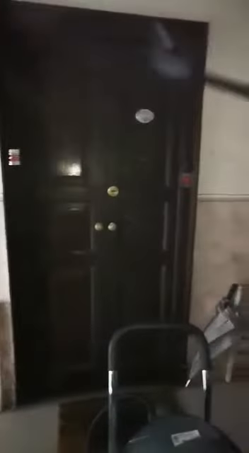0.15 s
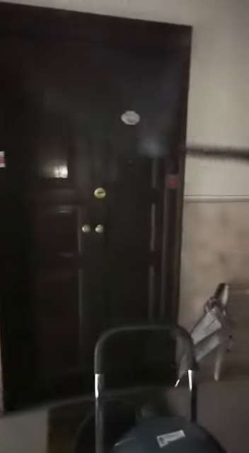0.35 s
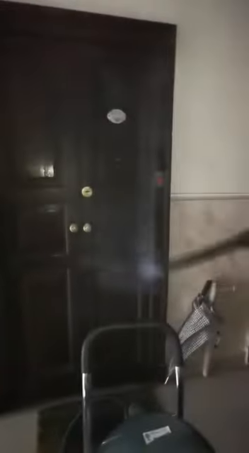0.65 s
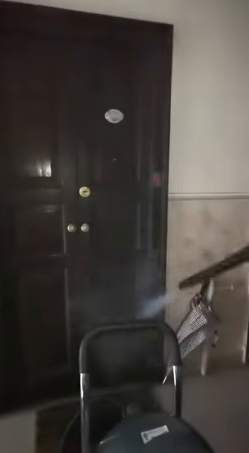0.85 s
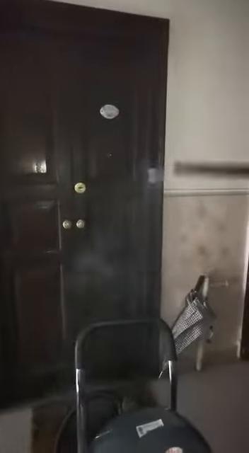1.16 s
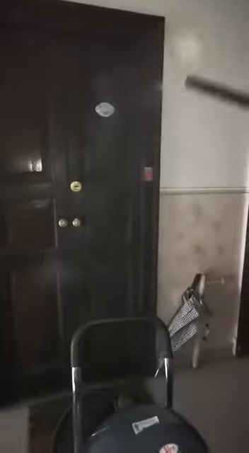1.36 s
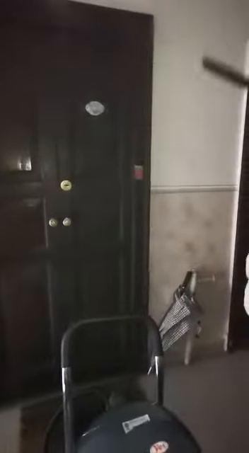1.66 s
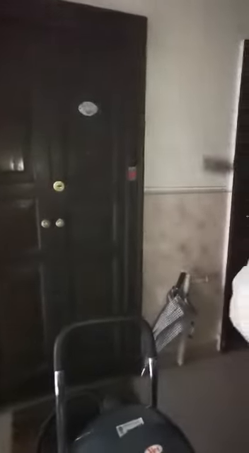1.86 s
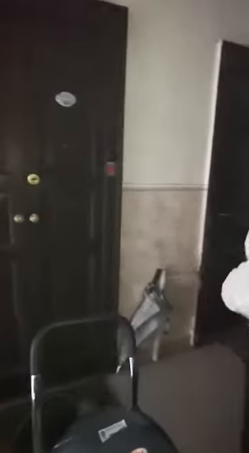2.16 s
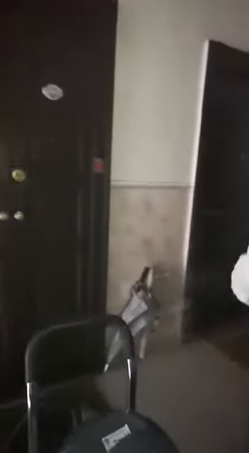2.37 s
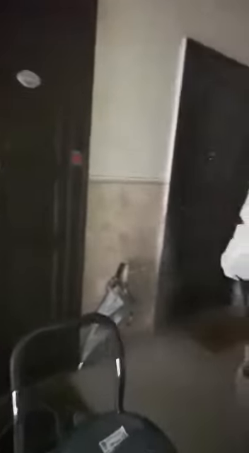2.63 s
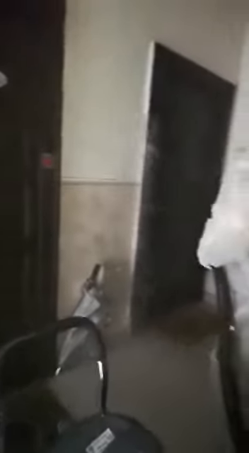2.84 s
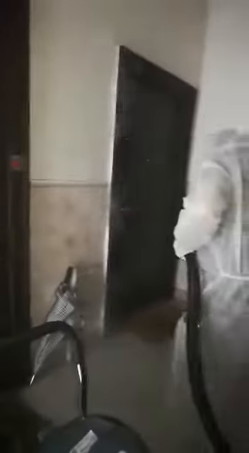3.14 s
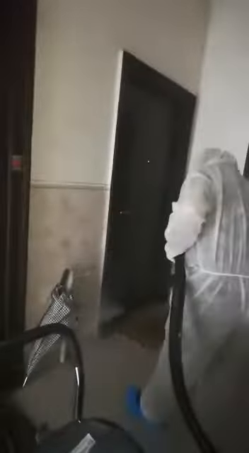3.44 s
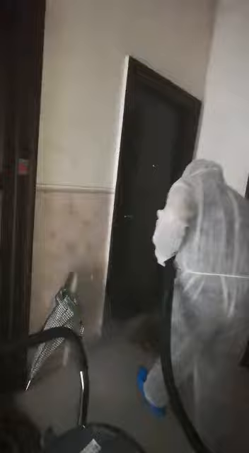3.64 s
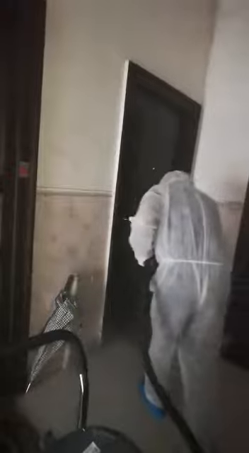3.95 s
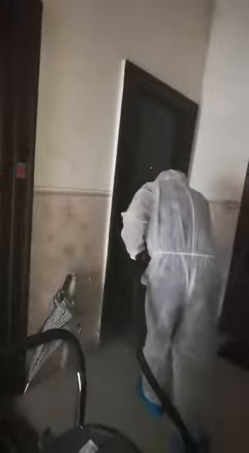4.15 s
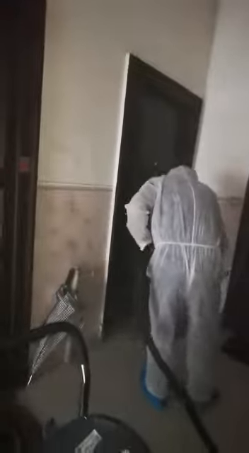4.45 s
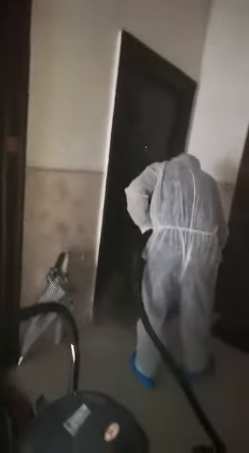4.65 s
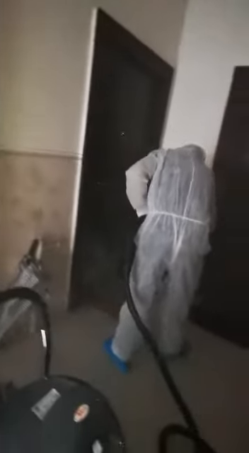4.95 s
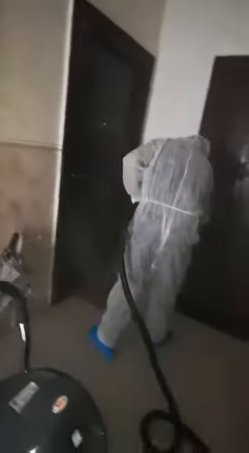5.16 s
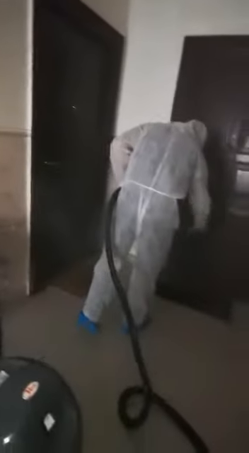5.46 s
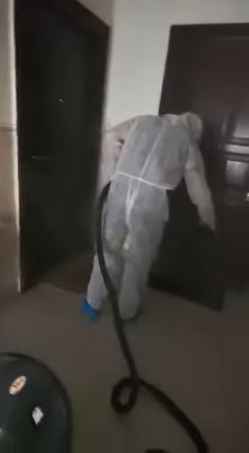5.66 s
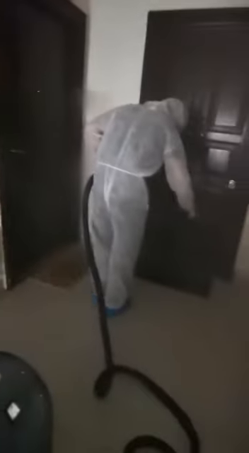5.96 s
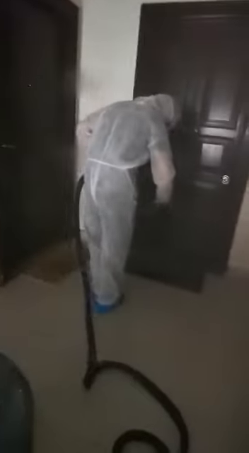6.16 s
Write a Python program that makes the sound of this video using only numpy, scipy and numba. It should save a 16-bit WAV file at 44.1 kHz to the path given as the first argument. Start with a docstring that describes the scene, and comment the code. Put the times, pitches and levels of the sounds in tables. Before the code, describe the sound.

A steam lance hisses steadily indoors while handling crackles tick on the microphone, and a low pump buzz joins halfway.

```python
"""A bare stairwell: a steam lance hisses against the doors, two or three metres from a hand-held phone.
The turbulent jet flutters and comes back off door, floor and walls. Half way through, the boiler's
mains-driven pump starts to buzz underneath. A finger shifts over the left microphone port: it ticks
and crackles there, and the phone's gain control ducks everything under the harder pushes."""
import sys
import numpy as np
from scipy import signal
from scipy.fft import rfft, irfft, next_fast_len
from scipy.io import wavfile
from scipy.ndimage import uniform_filter1d
from numba import njit

SR = 44100
rng = np.random.default_rng(int(sys.argv[2]) if len(sys.argv) > 2 else 0)


def store_pcm(level_fs):
    """Save levels as 16-bit WAV."""
    pcm = np.round(np.clip(level_fs, -1, 1) * 32767).astype(np.int16)
    wavfile.write(sys.argv[1], SR, np.atleast_2d(pcm).T)


N = 277815
TIME_S = np.arange(N) / SR


def undb(db):
    """Decibels to gain."""
    return 10 ** (np.asarray(db) / 20)


def curve_at(table, hz):
    """A spectrum table read on a log-frequency axis."""
    points_hz, value = np.transpose(table)
    return np.interp(np.log(hz), np.log(points_hz), value)


def wander(rate_hz):
    """Smooth random modulation: stepped levels, slewed twice."""
    hold = int(SR / rate_hz)
    steps = np.repeat(rng.standard_normal(N // hold + 1), hold)
    return 0.69 * uniform_filter1d(uniform_filter1d(steps, hold), hold)[:N]


# The pump's buzz, levels as they stand 1.5 s into its swell: mains_multiple, level_db, phase_rad
PUMP_PARTIALS = [(1, -80, -4), (2, -61.5, 2.5), (3, -60, -1), (4, -65.5, -1), (5, -69.5, -0.9),
                 (6, -69, -2.5), (7, -58, 0), (8, -57, -2), (9, -63.5, 1.2), (10, -77, 2)]

def pump_buzz():
    """The plunger strikes once a mains cycle; housing and walls take a moment to fill each partial."""
    mains_hz, start_s, swell_db_per_s = 49.965, 3.2, 0.65
    flat_share, run_up_s, fill_s = .25, .04, .025
    running_s = np.maximum(TIME_S - start_s, 0)
    cycles = mains_hz * (TIME_S + flat_share * run_up_s * np.exp(-running_s / run_up_s))  # starts flat
    buzz = 0
    for multiple, level_db, phase in PUMP_PARTIALS:
        fade_in = np.minimum(running_s / (multiple * fill_s), 1) ** 3
        gain = undb(level_db + swell_db_per_s * (running_s - 1.5) + 1.5 * wander(10))
        partial = np.sqrt(2) * np.cos(2 * np.pi * multiple * cycles + phase + 0.075 * wander(4.8))
        buzz = buzz + fade_in * gain * partial
    return buzz * undb([[-3], [0]])  # sits right of centre


# The finger's pushes as it shifts its grip: peak_s, movement_db, width_s
GRIP_SHIFTS = [(0.168, -61.5, 0.11), (0.292, -52.5, 0.075), (0.718, -54, 0.064), (0.987, -55.5, 0.044),
               (1.373, -58, 0.062), (1.478, -59, 0.09), (1.84, -51.5, 0.051), (2.147, -59, 0.094),
               (2.737, -50, 0.079), (2.965, -54, 0.043), (3.11, -52.5, 0.072), (3.64, -56.5, .05),
               (4.511, -49, 0.038)]

def grip_movement():
    """How much the finger moves: a swell for each shift over a resting creep."""
    movement = undb(-73.5)
    for peak_s, movement_db, width_s in GRIP_SHIFTS:
        slope_s = np.where(TIME_S < peak_s, width_s, 0.99 * width_s)
        movement = movement + undb(movement_db) * np.exp(-.5 * ((TIME_S - peak_s) / slope_s) ** 2)
    return movement


# Single sharp ticks of skin on the port: start_s, peak_db
SKIN_TICKS = [(0.2465, -27), (0.2959, -18), (0.6951, -19), (0.6968, -13.5), (1.8199, -19), (1.8329, -21),
              (1.8406, -22), (1.8463, -17), (1.8481, -19), (2.7122, -18), (2.723, -9), (2.727, -19),
              (2.7311, -12), (2.7341, -13), (2.7345, -9), (2.7351, -9), (2.7398, -13), (2.7418, -16),
              (2.7437, -8), (2.7481, -5), (2.8126, -24), (2.9478, -25), (2.9568, -19), (2.9584, -20),
              (3.0168, -24), (3.1078, -23), (3.1205, -23), (4.5014, -14), (4.5166, -23), (4.5226, -26)]

def finger_on_port():
    """Skin sticks and slips on the port: one-sided pressure spikes over a slow squeeze of trapped air."""
    slips_per_s, tick_s, undershoot_s = 900, 5.3e-5, .003
    movement = grip_movement()
    slips = rng.random(N) < slips_per_s / SR
    spikes = slips * undb(4 * np.minimum(rng.exponential(size=N), 3) + 13) * movement
    start_s, peak_db = np.transpose(SKIN_TICKS)
    np.add.at(spikes, np.round(start_s * SR).astype(int), undb(peak_db))
    age_s = np.arange(-12, 400) / SR
    snap = np.exp(-.5 * (age_s / tick_s) ** 2)
    undershoot = .09 * (age_s > 0) * np.exp(-np.abs(age_s) / undershoot_s)  # a soft thump in each tick
    crackle = signal.fftconvolve(spikes, snap - undershoot)[12:N + 12]
    rustle = signal.sosfilt(signal.butter(2, 9500, "high", fs=SR, output="sos"), rng.standard_normal(N))
    rumble = signal.sosfilt(signal.butter(1, 90, fs=SR, output="sos"), rng.standard_normal(N))
    squeeze = undb(37.5)
    return crackle + movement * (undb(6.5) * rustle + undb(18.5) * rumble + squeeze)


# Early reflections off door, floor and walls: delay_s
REFLECTIONS = [.0009, .0071, .0113, .0167, .0211, .0263, .0317, .0389]

def stairwell_echoes(hiss):
    """The hiss returns off the bare surfaces; each path drifts as the lance moves."""
    echo_db, drift_s = -17.5, 0.000314
    sent_times = [np.abs(TIME_S - delay_s - drift_s * wander(2)) for delay_s in REFLECTIONS]
    echoes = [sum(np.interp(sent_s, TIME_S, port) for sent_s in sent_times) for port in hiss]
    return undb(echo_db) * np.array(echoes)


# The steam's tone colour, brightest near 7 kHz: frequency_hz, relative_density_db
STEAM_COLOUR = [(40, -24), (120, -24.5), (300, -20.5), (600, -18.5), (1200, -14.5), (2400, -5),
                (3100, -7.5), (3800, -5), (4500, -7.5), (5800, -2.5), (6250, -4), (6900, 0.5), (7600, 0),
                (8000, -4), (8300, -9.5), (9300, -13), (10000, -18), (11000, -21.5), (15300, -21.5)]
# How much of the hiss both ports have in common: frequency_hz, common_share
STEAM_MONO_SHARE = [(100, 0.9), (640, .8), (1400, 1), (2400, 0.28), (3070, 0.55), (5000, 0)]
# Which way the hiss leans: frequency_hz, left_minus_right_db
STEAM_BALANCE = [(100, 2), (640, -0.5), (2400, -5), (3100, 0), (3800, -4.5), (6000, -1.5), (6900, 0.5),
                 (8000, -4), (9300, -3), (10200, 0), (15000, 4)]

def steam_spectrum(hz, size):
    """Stereo spectrum of turbulent noise: nearly mono in the lows and mids, wide in the treble."""
    left_lead_s = 4e-5
    common, left, right = rfft(rng.standard_normal((3, size)))
    share = np.clip(curve_at(STEAM_MONO_SHARE, hz), 0, 1)
    lead = np.exp(2j * np.pi * hz * left_lead_s)
    centre = np.array([lead * common, common]) * np.sqrt(share)
    sides = np.array([left, right]) * np.sqrt(1 - share)
    pan_db = np.array([[.5], [-.5]]) * curve_at(STEAM_BALANCE, hz)
    spectrum = (centre + sides) * undb(curve_at(STEAM_COLOUR, hz) + pan_db)
    nozzle_band = (hz > 5500) & (hz < 8500)  # the level is set by this band
    return spectrum * size / np.sqrt(2 * np.sum(np.abs(spectrum[:, nozzle_band]) ** 2))


# Fader moves for the nozzle's hiss and, riding on it, the roar on the door: time_s, hiss_db, roar_db
JET_MOVES = [(0, -32.5, -5), (.3, -31.5, -4), (.6, -32, -5), (.9, -32, -4.5), (1.25, -31.5, -4.5),
             (1.5, -32, -5.5), (1.75, -32.5, -4), (2.1, -30.5, -6), (2.45, -33, -4), (2.9, -33, -4),
             (3.3, -32.5, -3.5), (3.6, -34, -4), (3.9, -32.5, -2.5), (4.4, -33, -3), (4.8, -32.5, -3),
             (5.15, -31.5, -5), (5.6, -33.5, -1), (5.9, -31.5, -3.5), (6.1, -34, 0), (6.3, -34, -1.5)]

def steam_lance():
    """The jet hisses in half-octave bands that flutter separately; the lower ones carry the door's roar."""
    roar_top_hz = 4850
    time_s, *faders = np.transpose(JET_MOVES)
    hiss_db, roar_db = [np.interp(TIME_S, time_s, fader) for fader in faders]
    roar_swing_db = roar_db - roar_db.mean()
    size = next_fast_len(N)
    hz = np.maximum(np.arange(size // 2 + 1) * SR / size, 1)
    spectrum = steam_spectrum(hz, size)
    hiss = 0
    for centre_hz in 32 * 2 ** np.arange(0, 9.5, .5):
        bands_away = np.clip(2 * np.log2(hz / centre_hz), -1, 1)
        band = irfft(spectrum * np.cos(np.pi / 2 * bands_away) ** 2, size)[:, :N]
        roar_share = 1 / (1 + (centre_hz / roar_top_hz) ** 6)
        flutter_db = wander(5) + 1.34 * wander(18)
        hiss = hiss + undb(roar_share * roar_swing_db + flutter_db) * band
    return (hiss + stairwell_echoes(hiss)) * undb(hiss_db + 0.6 * wander(11))


def scene():
    """Steam and pump reach both ports, the finger only the left."""
    return steam_lance() + pump_buzz() + finger_on_port() * np.array([[1], [0]])


@njit
def follow_level(rectified, attack_s, release_s):
    """Envelope follower with separate rise and fall times."""
    envelope, level = np.empty(len(rectified)), rectified[:2000].mean()
    for i, sample in enumerate(rectified):
        level += (sample - level) / (SR * (attack_s if sample > level else release_s))
        envelope[i] = level
    return envelope


def record(dry):
    """The phone's linked gain control ducks on the finger's squeeze too; low cut and top cut follow."""
    threshold_db, low_cut_hz, top_cut_hz = -23.5, 35, 15100
    level = follow_level(np.abs(dry).max(axis=0), attack_s=.018, release_s=.15)
    ducked = dry * np.minimum(undb(threshold_db) / level, 1) ** 0.37
    low_cut = signal.butter(3, low_cut_hz, "high", fs=SR, output="sos")
    resting_pressure = ducked[None, :, :400].mean(axis=2, keepdims=True)
    settled = signal.sosfilt_zi(low_cut)[:, None, :] * resting_pressure  # opens without a thump
    cleared = signal.sosfilt(low_cut, ducked, zi=settled)[0]
    return signal.sosfilt(signal.ellip(10, .2, 75, top_cut_hz, fs=SR, output="sos"), cleared)


dry = scene()
out = record(dry)
store_pcm(out)
```